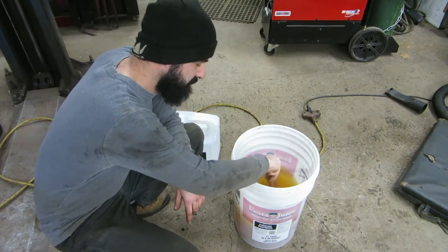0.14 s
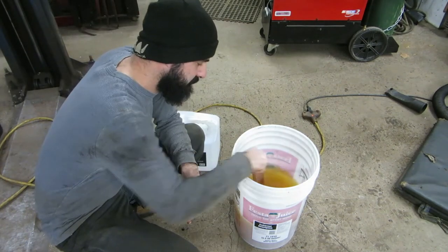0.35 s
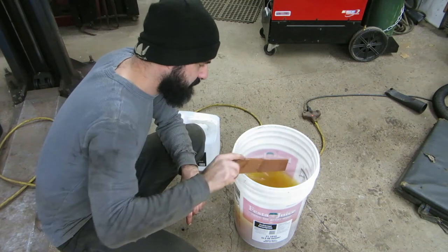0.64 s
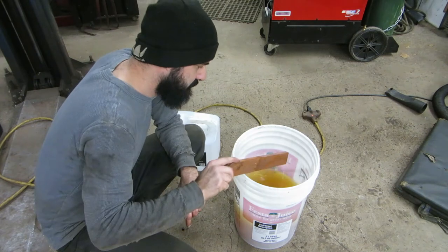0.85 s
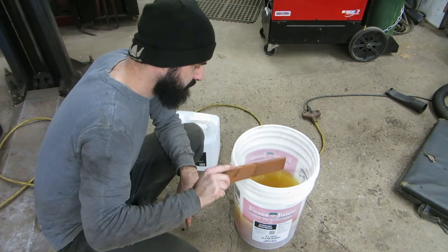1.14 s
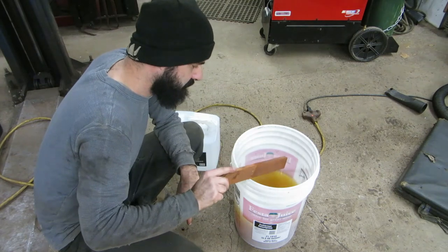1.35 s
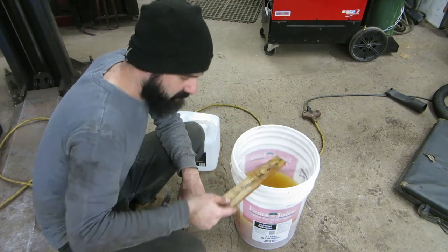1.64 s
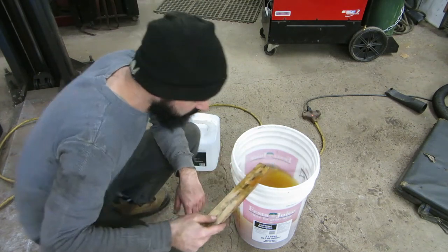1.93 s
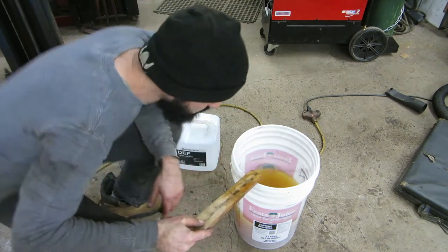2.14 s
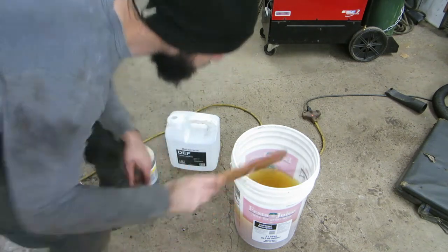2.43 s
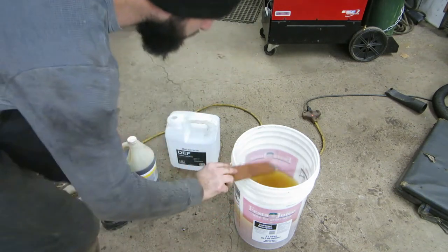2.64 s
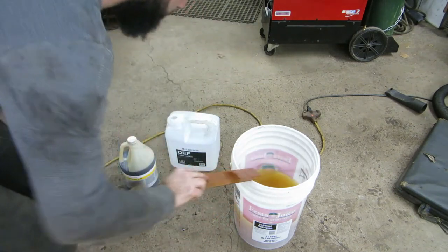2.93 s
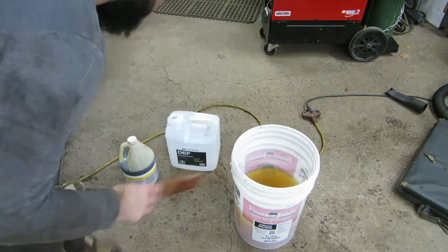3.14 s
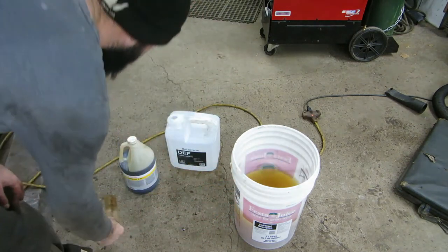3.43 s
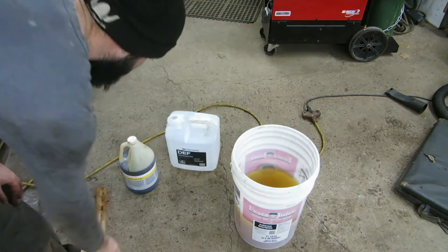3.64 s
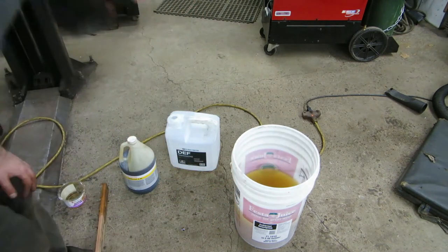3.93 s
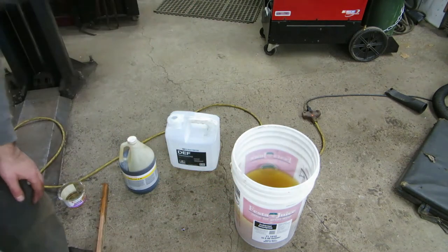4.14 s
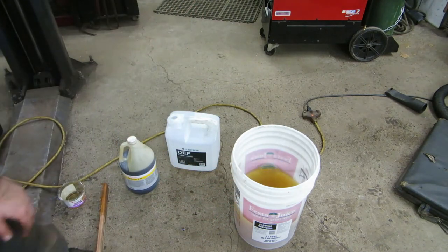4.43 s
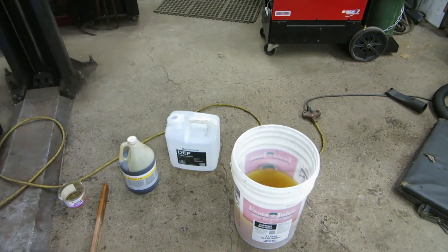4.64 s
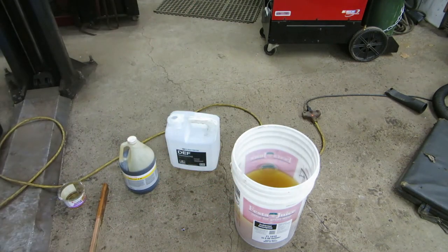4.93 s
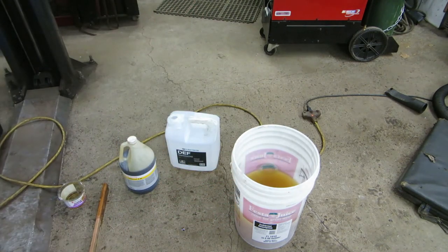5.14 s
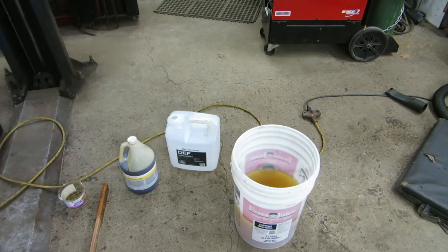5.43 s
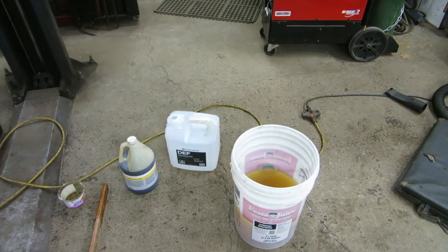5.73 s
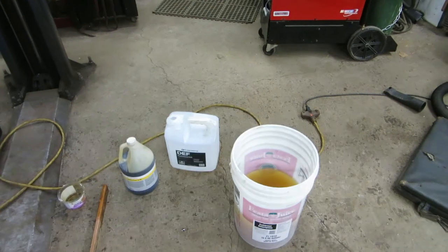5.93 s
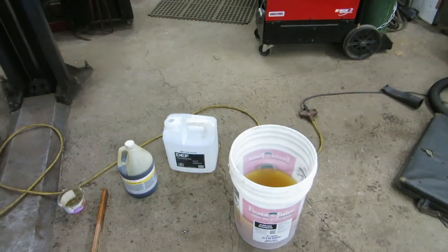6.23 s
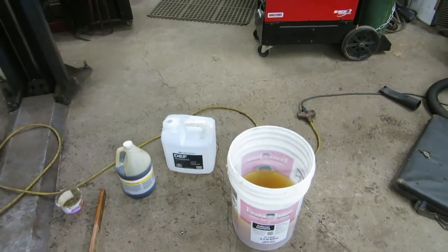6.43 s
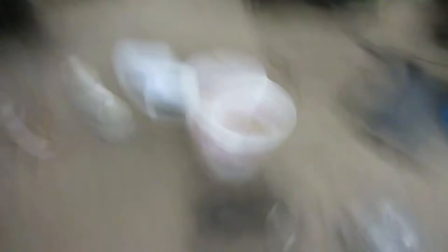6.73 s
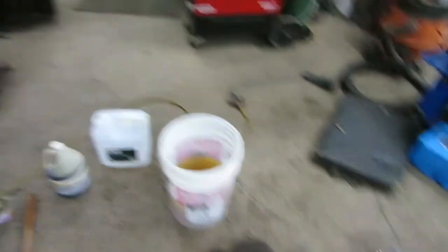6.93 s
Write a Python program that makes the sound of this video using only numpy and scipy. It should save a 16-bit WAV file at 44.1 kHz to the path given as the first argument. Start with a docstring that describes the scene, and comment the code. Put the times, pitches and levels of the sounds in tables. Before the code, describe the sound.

A steady hiss fills a hard, echoing workshop, heard close in stereo. For the first 0.7 seconds liquid fizzes and drips lightly, with faint knocks of a wet wooden paddle on a plastic pail. From 1.15 to 2.1 the knocks become firm and hollow, with two brighter drips near 1.1 and rough dragging along the rim. A gritty scuff comes around 2.45, and more taps and scraping at 2.7 to 3.05. After a soft thud at 3.3, the paddle drops at 3.63, cracking brightest at 3.68 and bouncing briefly. Heavy thuds land around 4.45, a board clatters sharply at 4.73 to 4.9, a sole scuffs at 5.0, and two strong thuds hit near 5.35 amid low rumble. From 5.77 hands click and rustle dry on the camera, with a sharp click at 6.39 and the loudest cluster at 6.73. The level sinks from 6.8, snapping back at 7.03.

```python
"""A wet wooden paddle drips, knocks and drags on the rim of a plastic pail of liquid, close to a camera's two capsules.
Dropped, it bounces on a workshop's concrete floor; about a second later a board clatters there with similar modes,
among thuds of boots and gear, gritty scuffs and low rumble. Last, hands click and rustle on the camera body, heard
dry through the housing; near the end the level dips briefly. Blows ring decaying sine modes, drops ring bubbles and
the rest is shaped noise; a hard hall echo follows them over a steady hiss."""
import sys
import numpy as np
from scipy import signal
from scipy.fft import rfft, irfft
from scipy.io import wavfile
from scipy.ndimage import uniform_filter1d

SR = 44100
rng = np.random.default_rng(int(sys.argv[2]) if len(sys.argv) > 2 else 0)


def dump_mix(stems):
    """Bounce the given channels to the path in sys.argv[1] as a 16-bit WAV at rate SR."""
    frames = np.atleast_2d(stems).T  # one column per channel
    limited = np.clip(frames, -1, 1)  # hard clip at full scale
    pcm = np.round(limited * 32767).astype(np.int16)
    wavfile.write(sys.argv[1], SR, pcm)


N = 312220
T = np.arange(N) / SR

# All levels are relative, ahead of the mix.
# paddle on pail: t/s, peak level/dB, then air column, wall modes, high modes, clatter level/dB
KNOCKS = [(0.002, -27, 7, -3.5, 9, -1.5), (0.199, -39.5, -16, 8, 17, -12),
          (0.705, -26.5, -6.5, 9.5, 24, -10.5), (1.163, -16, 3.5, -4.5, 2, -10.5),
          (1.351, -11, 3, 1, 5.5, -9.5), (1.57, -24.5, -2.5, -13.5, 10, -10.5),
          (1.689, -8.5, -4, -5, 1, -7), (1.962, -11.5, -6, 0.5, 8, -8.5), (2.059, -18, 4, 10.5, 18, -14),
          (2.731, -12.5, 0.5, 8, 13.5, -6.5), (2.83, -23, 2, -12, 1, 4), (3.022, -19, -1, -8, -4, -13)]
# modes of pail wall and air column: f/Hz, level/dB, t60/s
PAIL = [(66.7, -9, 0.19), (173, -22, 0.16), (238, -10, 0.19), (251.76, -2.5, 0.58), (315.5, -12, 0.2),
        (440, -13.5, 0.1), (737, -2.5, 0.073), (783, 2.5, 0.094), (1192, -1.5, 0.035), (1210, 1, 0.051),
        (1445, -3, 0.065), (1494, 3.5, 0.017), (1667, -2.5, 0.044), (2053, -8, 0.014), (2400, -35, 0.018),
        (3132, -11.5, 0.018)]


def undb(db):
    """Amplitude ratio of a level in dB."""
    return 10 ** (np.asarray(db) / 20)


def level(x, db=0):
    """Scale x to an RMS level in dB."""
    return x * undb(db) / np.sqrt(np.mean(x ** 2))


def fade(t60, seconds):
    """Time axis and an envelope that loses 60 dB in t60."""
    t = np.arange(int(seconds * SR)) / SR
    return t, np.exp(-np.log(1000) * t / t60)


def on_hz(table, hz):
    """Read a table at hz, interpolating along log frequency."""
    points = np.array(table)
    return np.interp(np.log(hz), np.log(points[:, 0]), points[:, 1])


def add(out, s, x, db):
    """Mix x in at time s with its peak at db."""
    i = int(s * SR)
    x = x[:N - i]
    out[..., i:i + len(x)] += np.multiply.outer(undb(db), x / np.abs(x).max())


def colour(x, table):
    """Filter x by a table of (f/Hz, level/dB)."""
    hz = np.maximum(np.fft.rfftfreq(x.shape[-1], 1 / SR), 1)
    return irfft(rfft(x) * undb(on_hz(table, hz)), x.shape[-1])


def band(x, hz, width):
    """Pass x through one resonance at hz, width Hz wide."""
    return signal.lfilter(*signal.iirpeak(hz, hz / width, fs=SR), x)


def walk(rate):
    """Random levels, rate new ones a second, with straight slews between; spread near 1."""
    k = int(SR / rate)
    return uniform_filter1d(np.repeat(rng.standard_normal(N // k + 1), k), k)[:N]


def pair(size, likeness):
    """Left and right noises whose correlation depends on frequency, mixed from mid and side."""
    hz, c = np.transpose(likeness)
    c = np.clip(c, -1 / 2, .98)
    mid = colour(rng.standard_normal(size), np.c_[hz, 10 * np.log10(1 + c)])
    side = colour(rng.standard_normal(size), np.c_[hz, 10 * np.log10(1 - c)])
    return np.array([mid + side, mid - side])


def strokes(rows, fall_db_s):
    """Gain of strokes that rise, hold and fall away: one line for the level, one for level plus the next column."""
    s, rise, hold, *db = np.transpose(rows)[:, :, None]
    since = T - s
    climb_db = 18 * np.minimum(since / rise - 1, 0)  # each starts 18 dB below its hold
    shape_db = climb_db - fall_db_s * np.maximum(since - rise - hold, 0)
    shape = undb(np.maximum(shape_db, -120)) * (since > 0)
    return [np.sum(shape * gain, axis=0) for gain in undb(np.cumsum(db, axis=0))]


def rubbing(gains, spectrum, split_hz, rough_db):
    """Rough hiss of a sliding surface, body and treble each with their gain."""
    grit = colour(rng.standard_normal(N) * undb(rough_db * walk(90)), spectrum)
    low = signal.sosfilt(signal.butter(2, split_hz, fs=SR, output="sos"), grit)
    return level(low) * gains[0] + level(grit - low) * gains[1]


def blows(events, modes, place_hz, clatter, clatter_t60, contact_s):
    """Every blow rings all modes, weighted by where it lands, inside a burst of clatter from the rough contact."""
    out, (hz, db, t60) = np.zeros(N), np.transpose(modes)[:, :, None]
    for s, peak_db, low_db, mid_db, high_db, clatter_db in events:
        t, decay = fade(t60, .4)
        place = sorted(zip(place_hz, (low_db, mid_db, high_db, 0)))
        place_db = on_hz(place, hz) + 1.5 * rng.standard_normal(hz.shape)
        sines = np.sin(2 * np.pi * (hz * t + rng.random(hz.shape)))
        ring = np.sum(undb(db + place_db) * decay * sines, axis=0)
        noise = colour(colour(rng.standard_normal(len(t)), clatter), place)
        burst = level(noise, clatter_db) * fade(clatter_t60, .4)[1]
        push = 1 - np.exp(-t / contact_s)  # the contact takes a moment to build
        add(out, s, push * (ring / np.abs(ring).max() + burst), peak_db)
    return out


def steady_hiss():
    """Stationary coloured noise, partly opposed at the two capsules."""
    spectrum = [(15, -47), (25, -13), (64, -8.5), (285, -11), (394, -13), (516, -15.5), (677, -7),
                (818, -5.5), (1330, -7.5), (1480, -8.5), (1650, -9), (5280, -17.5), (16000, -25)]  # noise floor: f/Hz, level/dB
    likeness = [(40, -0.6), (100, -2.1), (300, -1.27), (1500, -1.87), (5000, -0.44), (12000, -0.24)]
    return level(colour(pair(N, likeness), spectrum), -45.5) * undb([[-.4], [.4]])


def hall(x):
    """Diffuse echo of the workshop, each band dying at its own rate."""
    decay_times = [(60, 1), (250, 0.54), (700, 0.58), (2000, 0.53), (5000, 0.43), (12000, 0.21)]  # echo decay: f/Hz, t60/s
    likeness = [(40, -.1), (80, -0.79), (160, 0.71), (350, 0.8), (700, 0.69), (2000, 0.85), (4000, 0.71),
                (12000, -0.14)]
    noise = pair(SR, likeness)
    centres_hz = 30 * 2 ** np.arange(0, 9.2, 1 / 2)
    tail = sum(band(noise, hz, hz / 3) * fade(on_hz(decay_times, hz), 1)[1] for hz in centres_hz)
    tail *= 1 - fade(0.024, 1)[1]  # echoes need a few ms to build up
    return signal.fftconvolve(x[None], tail / np.sqrt(np.sum(tail[0] ** 2)), axes=1)[:, :N]


def rumble():
    """Low noise as the man shifts his weight: fluttering resonances, and a hollow boom."""
    # shifts of weight: start t/s, rise/s, hold/s, level/dB, hollow boom level/dB above that
    shifts = [(3.25, 0.035, 0.051, -34.5, -6.5), (4.36, 0.013, 0.046, -49, -11),
              (4.44, 0.029, 0.076, -29, 5.5), (5.0, 0.016, 0.063, -45.5, -11),
              (5.25, 0.052, 0.061, -36, -6), (5.42, 0.044, 0.15, -38, -1), (5.62, .04, 0.18, -40.5, -1),
              (5.92, 0.021, 0.043, -40, 1), (6.06, 0.017, 0.053, -50.5, -4), (6.18, .02, 0.084, -53, -9)]
    resonances = [(225, 57, 0), (299, 61, -1.5), (590, 780, -4)]  # f/Hz, width/Hz, level/dB

    def tone(hz, width):
        return level(band(band(rng.standard_normal(N), hz, width), hz, width))

    tones = sum(undb(db + 2.6 * walk(15)) * tone(hz, width) for hz, width, db in resonances)
    shake, hollow = strokes(shifts, fall_db_s=184)
    return level(tones) * shake + tone(380.6, 68) * hollow


def thuds():
    """Boots and gear hit the floor: noise bursts with the colour of heavy rubber and steel on concrete."""
    hits = [(3.272, -19.5, 12, 6), (4.368, -29.5, 6, 11.5), (4.448, -14, 23, 5.5), (4.469, -3.5, 6.5, 2),
            (4.52, -13.5, 11.5, -3), (4.578, -12.5, -9, 10), (4.679, -29.5, -24, 30.5), (5.178, -32, 16, 5),
            (5.317, -8.5, -5, 18), (5.382, -4.5, -8.5, 12), (5.419, -11.5, 11, -6)]  # t/s, peak level/dB, bass level/dB, treble level/dB
    spectrum = [(35, -70), (60, 2), (144, -46.5), (295, -5.5), (340, -10), (381, 0.5), (430, -10),
                (679, -9.5), (938, -10.5), (1180, -10), (4730, -37.5), (15000, -60.5)]  # rubber and steel on concrete: f/Hz, level/dB
    out, (t, decay) = np.zeros(N), fade(0.076, 1 / 2)
    push = 1 - np.exp(-t / 0.00068)
    for s, peak_db, bass_db, treble_db in hits:
        tilt = [(120, 0), (300, bass_db), (420, bass_db), (650, 0), (1200, 0.0037), (5000, treble_db)]
        burst = colour(colour(rng.standard_normal(len(t)), spectrum), tilt)
        add(out, s, burst * decay * push, peak_db)
    return out


def scuffs():
    """Soles slide on gritty concrete: rough coloured noise in short strokes."""
    slides = [(2.44, 0.065, 0.057, -42, 4), (3.21, 0.028, 0.044, -54.5, 3.5), (5.0, 0.01, 0.065, -43.5, 2)]  # start t/s, rise/s, hold/s, level/dB, treble level/dB above that
    spectrum = [(120, -60), (200, -19), (267, -8), (459, -6.5), (748, 6.5), (864, 0.5), (2170, -0.5),
                (7420, -17), (15000, -25)]  # sole on grit: f/Hz, level/dB
    return rubbing(strokes(slides, fall_db_s=196), spectrum, split_hz=7700, rough_db=1.6)


def click(hz, t60, width, rise_s):
    """A short noise burst through one housing resonance, a little unalike at the two capsules."""
    t, decay = fade(t60, .1)
    both, own = rng.standard_normal((2, len(t)))
    shake = both + 0.66 * own * np.array([[1], [-1]])
    for _ in range(3):
        shake = band(shake, hz, width)
    shake = shake * decay * (1 - np.exp(-t / rise_s))
    return np.roll(shake[0], 3), shake[1]  # the housing reaches the left capsule 3 samples late


def camera():
    """Dry clicks, ticks and jolts carried straight through the housing, over the rustle of the hands."""
    # fingers and mount on the body: t/s, peak level/dB, centre f/Hz, t60/s, left minus right level/dB, thump level/dB
    grips = [(5.768, -29, 1320, 0.021, 9, -10), (5.781, -20, 2150, 0.04, -3, -7),
             (5.8, -16, 1070, 0.068, 0, -12), (5.864, -17, 850, 0.022, 0, -15),
             (5.881, -24, 680, 0.076, 1, 6), (6.031, -19, 1480, 0.018, -4, -4),
             (6.198, -15.5, 1530, 0.034, 0, -13), (6.256, -17, 836, 0.028, 2, -15),
             (6.391, -5.5, 1400, 0.014, -3, -12.5), (6.409, -20, 1230, 0.036, 0, -24),
             (6.454, -36, 700, 0.021, 0, -10), (6.511, -23, 790, 0.041, -6.5, -9),
             (6.527, -31.5, 590, 0.028, -10, -7), (6.574, -26.5, 1660, 0.049, 1, -8),
             (6.585, -27.5, 610, 0.057, 2, -23), (6.699, -16.5, 1500, 0.015, -2, -13),
             (6.716, -17, 1420, 0.055, 0, -9), (6.731, -7.5, 710, 0.019, -1, -4.5),
             (6.7374, 0, 1430, 0.021, -3, -13.5), (6.7456, -3, 990, 0.03, -5, -14),
             (6.778, -17, 990, 0.041, -4, -7), (6.799, -20.5, 756, 0.06, -5, -13),
             (7.028, -30, 1590, 0.061, 0, -42)]
    ticks = [(6.7362, 1, -7), (6.7401, -1.5, 3), (6.7479, -10.5, 13.5), (6.771, -13, -2), (6.8037, -22, -6),
             (6.8136, -6.5, -3), (6.8284, -16.5, -11), (6.8526, -23, 0)]  # thin plastic of the body: t/s, peak level/dB, left minus right level/dB
    slides = [(6.2, 0.028, 0.097, -43, -4), (6.4, .02, 0.031, -53, -20), (6.57, 0.021, 0.06, -49.5, -12),
              (6.71, 0.028, 0.0068, -29, -2), (6.78, 0.037, 0.15, -45, -23),
              (7.025, 0.0071, 0.033, -52, -8)]  # sliding hands: start t/s, rise/s, hold/s, level/dB, treble level/dB above that
    spectrum = [(120, -32), (200, -23), (521, -40), (613, -10.5), (998, -6.5), (1570, -3), (2290, 1),
                (2550, -5.5), (3470, -6.5), (15000, -27)]  # hand on housing: f/Hz, level/dB
    out = np.zeros((2, N))
    for s, peak_db, hz, t60, pan_db, thump_db in grips:
        knock = click(hz, t60, 1.4 * hz, 0.00055)
        thump = click(247, 0.044, 414, 0.0009)
        jolt = click(61, 0.18, 90, 0.0031)
        for ear, sign in enumerate((1, -1)):
            add(out[ear], s, knock[ear], peak_db + sign * pan_db / 2)
            add(out[ear], s, thump[ear], peak_db + thump_db)
            # a tilt pushes the capsules opposite ways
            add(out[ear], s, sign * jolt[ear], peak_db + thump_db - 20.5)
    for s, peak_db, pan_db in ticks:
        for ear, tick in enumerate(click(6830, 0.0055, 5300, 0.00019)):
            add(out[ear], s, tick, peak_db + (1 / 2 - ear) * pan_db)
    rustle = rubbing(strokes(slides, fall_db_s=204), spectrum, split_hz=6100, rough_db=2.3)
    return out + rustle * undb([[-1.2], [1.2]])


def bubble(hz, t60, glide):
    """A decaying sine whose pitch climbs from hz, as of a bubble in liquid."""
    t, decay = fade(t60, .06)
    return decay * np.sin(2 * np.pi * hz * t * (1 + glide * t / t60))


def liquid():
    """Drops are a splat and a rising bubble, weaker against the splat when small; tiny bubbles fizz early on."""
    drops = [(0.0857, -40, 3660), (0.111, -31.5, 5700), (0.129, -36, 4200), (0.1481, -32, 3370),
             (0.208, -37, 2980), (0.2588, -36.5, 2440), (0.343, -39.5, 2390), (0.3716, -40, 2930),
             (0.4506, -38, 3220), (0.463, -36.5, 3690), (0.489, -37, 3380), (0.5, -37.5, 6400),
             (0.604, -39, 3110), (0.648, -37, 3780), (0.6903, -27, 6430), (0.9234, -44, 5240),
             (1.1069, -21, 5770), (1.1745, -16, 7300), (1.2794, -36, 8200), (3.465, -43, 6580)]  # falling from the paddle: t/s, peak level/dB, bubble f/Hz
    swirl = [(0.02, 0.078, 0.038, -48), (0.42, .04, .03, -69), (0.56, 0.091, .03, -61)]  # bubble bursts in the swirling liquid: start t/s, rise/s, hold/s, level/dB
    out, fizz = np.zeros(N), np.zeros(N)
    drop_t60 = .036  # s
    for s, peak_db, hz in drops:
        noise = band(rng.standard_normal(int(.06 * SR)), hz, 0.13 * hz)
        splat = level(band(noise, hz, 3.0 * hz)) * fade(drop_t60, .06)[1]
        ring = undb(-12 * np.log2(hz / 3000)) * bubble(hz, drop_t60, 0.125)
        add(out, s, ring + undb(-0.5) * splat, peak_db)
    for when, pitch, size in rng.random((500, 3)):
        add(fizz, .8 * when, bubble(1700 * 3.5 ** pitch, 0.022, 0.19), -5 * np.log(size + 0.0079))
    return out + fizz / np.std(fizz[:SR]) * strokes(swirl, fall_db_s=100)[0]


def drag():
    """Dense stick-slip noise shakes the pail modes, in long strokes and after each knock; grit hisses above them."""
    # paddle edge over the rim: start t/s, rise/s, hold/s, level/dB, grit hiss level/dB above that
    drags = [(1.74, 0.15, .1, -41.5, -19), (1.97, .1, 0.098, -36.5, -27), (2.2, .03, 0.043, -44, -10),
             (2.78, 0.11, 0.099, -39.5, -14), (2.92, 0.028, 0.11, -36, -9.5)]
    slips = rng.standard_normal(N) * undb(2.5 * walk(80))
    body = sum(undb(db) * level(band(slips, hz, 3.8 / t60)) for hz, db, t60 in PAIL)
    grit = band(band(slips, 3960, 1800), 3200, 5000)
    # the wet paddle chatters on after each knock, 28 dB below its peak
    chatter = [(s, .004, .01, peak_db - 28, -22) for s, peak_db, *_ in KNOCKS]
    shake, grit_gain = np.add(strokes(drags, fall_db_s=214), strokes(chatter, fall_db_s=390))
    return level(body) * shake + level(grit) * grit_gain


def knocks():
    """The paddle strikes the pail and rings its wall and air column."""
    places = (250, 800, 3200, 1400)  # where the three mode columns and the unweighted modes sit: f/Hz
    clatter = [(150, -11), (700, 6.5), (1600, -4.0), (3000, -18.5), (12000, -31)]  # f/Hz, level/dB
    return blows(KNOCKS, PAIL, places, clatter, clatter_t60=0.049, contact_s=0.0015)


def wood_on_floor():
    """The dropped paddle bounces on concrete; from 4.727 s a board clatters, rung with the same bending modes."""
    # paddle, then from 4.727 s the board: t/s, peak level/dB, then low, middle, high modes, clatter level/dB
    impacts = [(3.630, -13, 3, 1, 7.5, -10), (3.682, -0.5, -6, 8, -3, -12.5),
               (3.709, -13, 10.5, 8, 12.5, -14.5), (3.761, -17, 2, 0, 7.5, -7),
               (3.789, -16.5, -3, 8, 9, -7), (4.727, -2.1, -23, 10, 12.5, -4.5),
               (4.797, -10.5, -21, 25, -13, -6), (4.815, -15, -18, -25, -11.5, 2),
               (4.839, -21, -9.5, -8, -3, 0), (4.868, -17.5, -15, 27, -3, -26),
               (4.900, -24, -16.5, -13, -20, -4)]
    modes = [(644.6, 0.5, 0.23), (679.7, -1, 0.57), (935, 1, 0.12), (1233, 3.5, 0.056), (1492, -17, 0.28),
             (1636, 6, 0.14), (1676, 2, 0.13), (1940, -8.5, 0.072), (2230, -31, 0.18), (2200, -34, 0.07),
             (2750, -17, 0.035), (2870, -14, 0.051), (3223, -14, 0.12), (3264, -6.5, 0.095),
             (3970, -26.5, 0.081), (4160, -25.5, .05), (4800, -25.5, 0.045)]  # bending modes of the paddle, lent to the board: f/Hz, level/dB, t60/s
    places = (700, 1970, 3300, 1660)  # where the three mode columns and the unweighted modes sit: f/Hz
    clatter = [(130, -25), (250, 4.0), (800, -1.0), (2500, -6), (5000, -17), (12000, -35.5)]  # f/Hz, level/dB
    return blows(impacts, modes, places, clatter, clatter_t60=0.071, contact_s=0.00019)


def scene():
    """Sum each source direct and through the hall, then add the dry housing sounds and the hiss."""
    low, far = rumble(), thuds()
    floor = wood_on_floor() + scuffs()
    hands = camera()
    wet, pail = liquid(), knocks() + drag()
    send = undb(-4.5) * pail + undb(-8.0) * wet + undb(-4.5) * floor
    send += undb(-1.83) * far + undb(-4) * low + undb(-20.0) * hands.mean(axis=0)
    # left and right levels in dB
    direct = (pail + wet) * undb([[-.5], [.5]]) + floor * undb([[-.7], [.7]])
    direct += far * undb([[-4], [-3]]) + low * undb([[-.6], [.6]])
    air = direct + hall(send) * undb([[-.6], [.6]])
    # small capsules hear little bass
    air = signal.sosfilt(signal.butter(2, 194, "high", fs=SR, output="sos"), air)
    return air + hands + steady_hiss()


def record(dry):
    """The level dips briefly, the capsule dulls the top, the loudest peaks round off and the top is cut."""
    dip = [(6.80, 0), (6.87, -7), (6.95, -11), (7.02, -15), (7.027, 0)]  # brief dip: t/s, level/dB
    capsule = [(7000, -2), (11000, -6.5), (15000, -11.5)]  # microphone response: f/Hz, level/dB
    x = colour(dry * undb(np.interp(T, *np.transpose(dip))), capsule)
    rounded = np.tanh(0.77 * x) / 0.79
    return signal.sosfilt(signal.ellip(10, .2, 60, 16250, fs=SR, output="sos"), rounded)


dry = scene()
out = record(dry)
dump_mix(out)
```